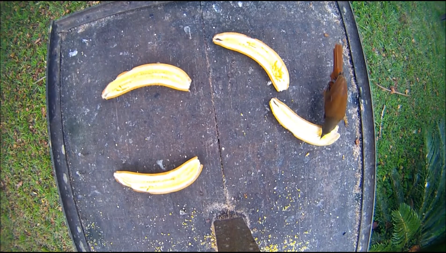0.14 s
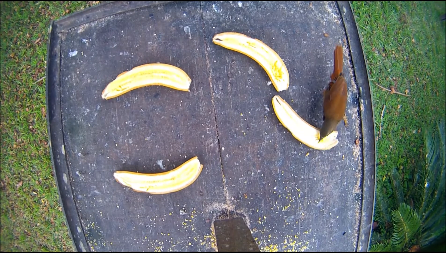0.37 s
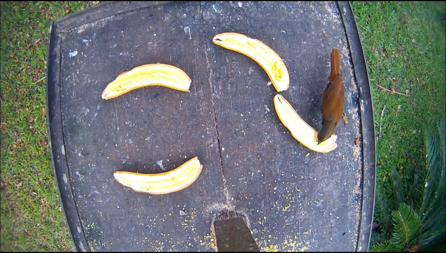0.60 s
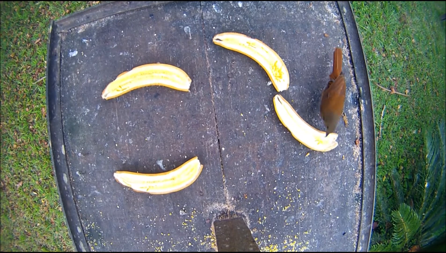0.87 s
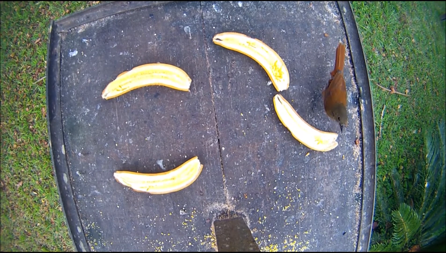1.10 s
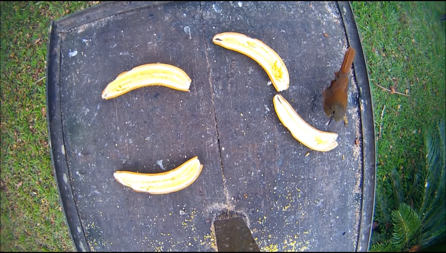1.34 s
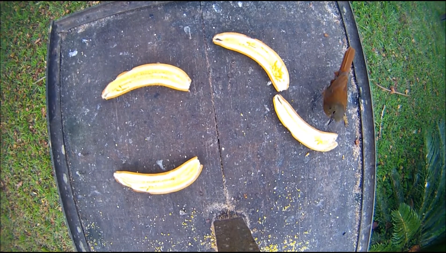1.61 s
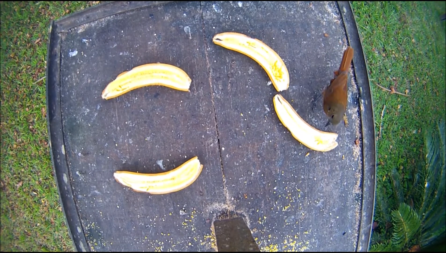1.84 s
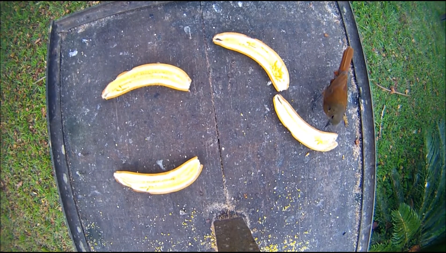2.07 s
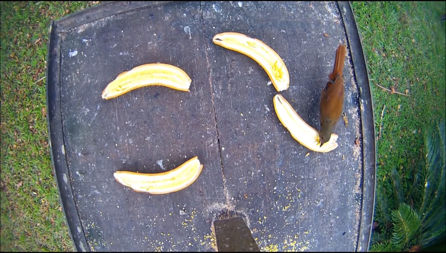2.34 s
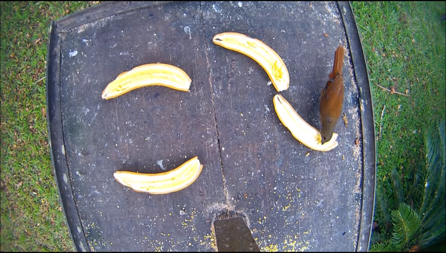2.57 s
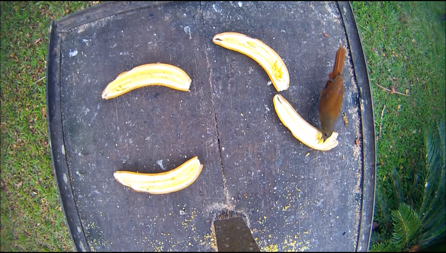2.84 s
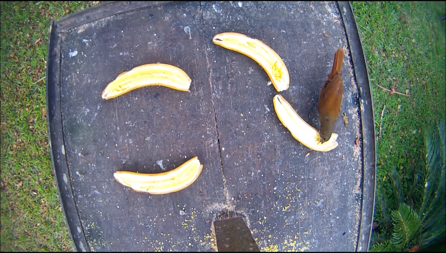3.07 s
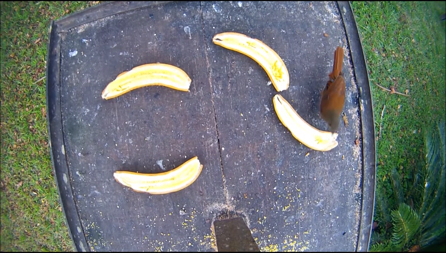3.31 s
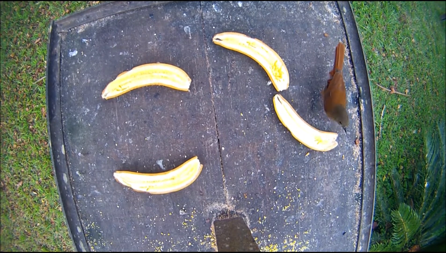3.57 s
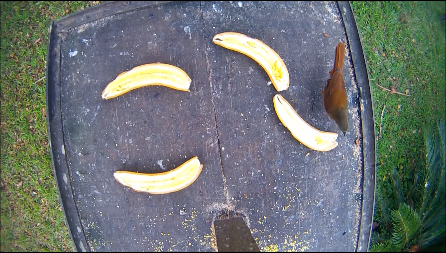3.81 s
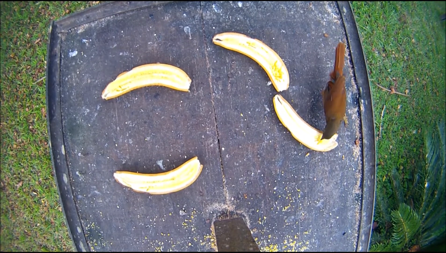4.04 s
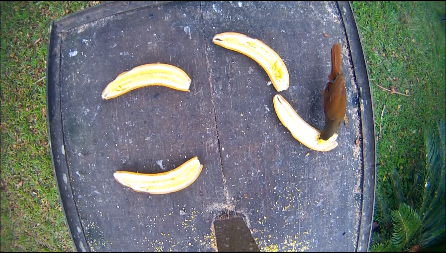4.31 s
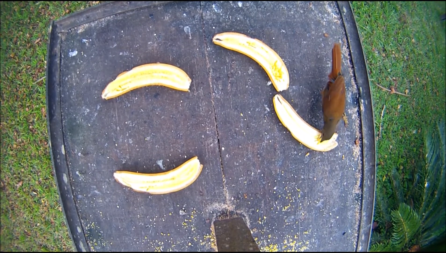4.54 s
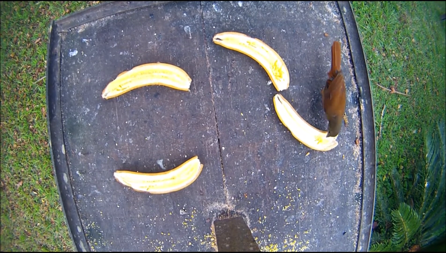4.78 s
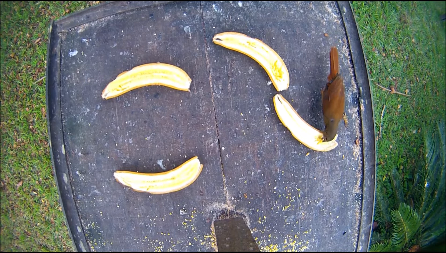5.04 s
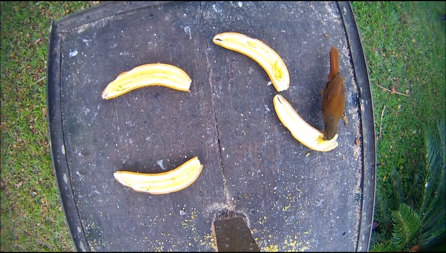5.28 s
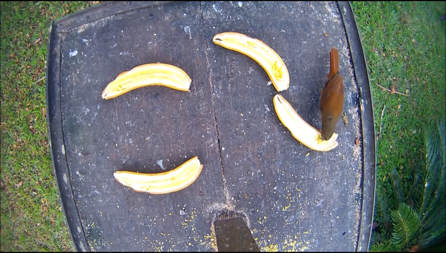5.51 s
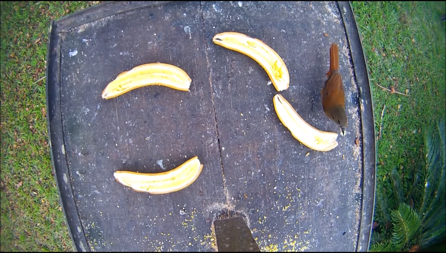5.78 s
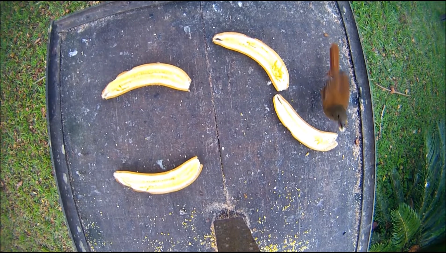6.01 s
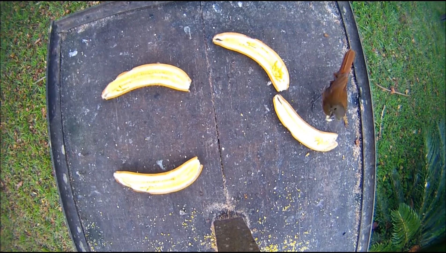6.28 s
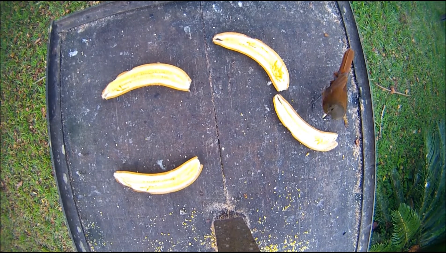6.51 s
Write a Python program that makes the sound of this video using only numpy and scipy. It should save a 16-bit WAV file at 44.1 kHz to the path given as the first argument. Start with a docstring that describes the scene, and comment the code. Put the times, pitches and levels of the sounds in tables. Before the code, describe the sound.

Outdoor feeder, heard from close by in stereo: crickets shimmer continuously, near and far, over a faint hush and low distant drone. A bright chirp slides down near the start, then sparse bird notes come from several distances, more lively in the second half. Irregular quiet thumps of a beak on wood, brushing feet and gentle wind rumble sit underneath, with light leafy echoes.

```python
"""Crickets trill in a garden, a few near and many far: falling tone bursts, repeated.
Birds call at several distances in gliding near-sine tones, and a bush cricket buzzes high above; leaves echo.
A small bird pecks fruit on a wooden feeder board: decaying low modes, with band noise for its feet.
A light breeze rumbles in the two microphones over a low drone and a faint hush, all shaped noise."""
import sys
import numpy as np
from scipy import signal
from scipy.fft import rfft, irfft, next_fast_len
from scipy.io import wavfile
from scipy.ndimage import uniform_filter1d

SR = 44100
rng = np.random.default_rng(int(sys.argv[2]) if len(sys.argv) > 2 else 0)


def gain_from_decibels(decibels):
    """Convert decibel values to linear amplitude factors."""
    exponent = np.asarray(decibels, float) / 20
    return 10 ** exponent


def store_wav(level_fs):
    """Save 16-bit WAV to argv[1]."""
    pcm = np.round(np.clip(np.atleast_2d(level_fs), -1, 1) * 32767)
    wavfile.write(sys.argv[1], SR, pcm.T.astype(np.int16))


N = 292383


def evened(x):
    """Scales to rms 1."""
    return x / np.sqrt(np.mean(x ** 2) + 1e-20)


def read(points, hz):
    """Interpolates a spectrum table on a log-frequency axis."""
    f, value = np.transpose(points)
    return np.interp(np.log(hz + 1), np.log(f + 1), value)


def curve(rows, column=1):
    """One column of a level table as a gain for every sample."""
    table = np.transpose(rows)
    return gain_from_decibels(np.interp(np.arange(N) / SR, table[0], table[column]))


def add(mix, start_s, sound, pan_db):
    """Places a sound, left louder than right by pan_db."""
    part = mix[:, max(round(start_s * SR), 0):][:, :len(sound)]
    gains = gain_from_decibels(np.array([[pan_db / 2], [-pan_db / 2]]))
    part += gains * sound[:part.shape[1]]


def garden(x, t60_s, same):
    """Echoes from leaves, walls and ground: sparse taps of random sign that die away."""
    slots = np.arange(120, SR // 2, 20)[:, None]
    at = slots + rng.integers(0, 20, (len(slots), 2))
    taps = np.zeros((SR // 2 + 20, 2))
    tap_gain = rng.choice([-1., 1.], at.shape) * gain_from_decibels(-60 * at / SR / t60_s)
    np.put_along_axis(taps, at, tap_gain, 0)
    shared, own = (taps / np.linalg.norm(taps[:, 0])).T
    tails = np.array([shared, same * shared + np.sqrt(1 - same ** 2) * own])
    return signal.fftconvolve(x, tails, axes=1)[:, :N]


def stroke(hz):
    """One scrape of a cricket's wing: a short tone burst that falls in pitch."""
    length_s, fall_share = .0055, .1
    u = np.arange(0, 1, 1 / (length_s * SR))
    turns = np.cumsum(hz * (1 + fall_share * (.5 - u))) / SR
    return np.sin(np.pi * u) ** 2 * np.sin(2 * np.pi * turns)


# trills of the nearer crickets: (first stroke [s], length [s], level [dB], wing pitch [Hz])
NEAR_TRILLS = [(.017, .11, -57, 6400), (.0835, .245, -56, 6400), (.16, .09, -52, 6110),
               (.437, .155, -55, 6250), (.6465, .205, -55, 6190), (.714, .09, -56, 6400),
               (.983, .11, -54, 6390), (1.08, .16, -57, 6200), (1.187, .2, -54, 6440),
               (1.402, .14, -55, 6160), (1.542, .25, -54, 6270), (1.652, .065, -54, 6420),
               (1.6955, .135, -57, 6400), (1.859, .09, -55, 6440), (1.957, .155, -53, 6340),
               (2.151, .225, -55, 6340), (2.37, .045, -57, 6200), (2.4435, .275, -54, 6330),
               (2.612, .09, -55, 6330), (2.7355, .11, -55, 6430), (2.796, .11, -56, 6410),
               (2.9215, .23, -54, 6140), (3.006, .135, -55, 6430), (3.245, .09, -53, 6030),
               (3.246, .2, -58, 6350), (3.345, .11, -55, 6380), (3.5455, .18, -56, 6400),
               (3.7585, .11, -59, 5700), (3.839, .18, -53, 6400), (4.1015, .155, -53, 6320),
               (4.198, .135, -54, 6340), (4.3665, .09, -57, 6460), (4.4465, .2, -55, 6470),
               (4.631, .09, -55, 6410), (4.7885, .205, -57, 6190), (4.8285, .155, -56, 6450),
               (5.067, .23, -57, 6210), (5.098, .155, -55, 6400), (5.391, .11, -54, 6400),
               (5.428, .135, -56, 6390), (5.458, .09, -55, 6400), (5.6815, .11, -54, 6460),
               (5.7165, .245, -59, 6320), (5.994, .205, -57, 6220), (6.1145, .18, -57, 6360),
               (6.265, .11, -54, 6460), (6.358, .245, -56, 6340)]


def near_crickets():
    """Even wing strokes, faster at higher pitch; strength and pitch vary a little."""
    pace_per_s, pace_at_hz, pace_per_khz = 44.9, 6400, 5
    spread_db, spread_pitch_share = 1.6, .015
    out = np.zeros((2, N))
    for s, length, db, hz in NEAR_TRILLS:
        rate = pace_per_s + pace_per_khz * (hz - pace_at_hz) / 1000
        chance = rng.standard_normal((16, 2)) * [spread_db, spread_pitch_share]
        times = np.arange(0, length - .5 / rate, 1 / rate)
        for at, (size_db, tune) in zip(times, chance):
            sound = gain_from_decibels(db + size_db) * stroke(hz * (1 + tune))
            add(out, s + at - .0055 / 2, sound, 5.5)  # centred on its time
    return gain_from_decibels(.8) * (out + gain_from_decibels(-6) * garden(out, .12, .92))


# chorus swelling and sinking: (time [s], low kinds level [dB], high kind level [dB])
CHORUS_LEVEL = [(0, -65.5, -73), (.3, -66.5, -78), (.74, -66.5, -67.5), (1.03, -66, -74.5),
                (1.75, -64, -69.5), (2.0, -66, -72.5), (2.3, -67, -70.5), (3.1, -66.5, -73.5),
                (3.32, -62.5, -76), (3.47, -70, -76), (3.6, -62, -72), (3.86, -73.5, -80), (4.1, -64, -69),
                (4.74, -65.5, -76), (5.24, -65, -71), (5.98, -63.5, -73), (6.63, -65.5, -67.5)]
# kinds of far cricket: (pitch [Hz], spread [Hz], relative level [dB], CHORUS_LEVEL column)
CHORUS_KINDS = [(5740, 300, -.5, 1), (6450, 280, -1.5, 1), (7300, 550, 0, 2)]


def far_crickets():
    """Many unsynchronised trills, each at its own pitch and pace, blur into a throbbing band."""
    trills_per_kind = 500
    bands = np.zeros((3, N + SR))  # row = level column; row 0 unused
    for hz, spread_hz, db, column in CHORUS_KINDS:
        places = rng.random((trills_per_kind, 2))
        traits = rng.standard_normal((trills_per_kind, 10))
        for k, ((start, pace), (tune, size, *jitter)) in enumerate(zip(places, traits)):
            s = (k + start) / trills_per_kind * (N / SR + .2)
            at = s + np.arange(8) / (43 + 3.5 * pace) + .0005 * np.array(jitter)
            voice = gain_from_decibels(db + 2 * size) * stroke(hz + spread_hz * tune)
            where = (abs(at) * SR).astype(int)[:, None] + np.arange(len(voice))
            bands[round(column)][where] += voice
    bands = bands[:, SR // 5:][:, :N]  # already under way at the start
    chorus = sum(curve(CHORUS_LEVEL, column=k) * evened(bands[k]) for k in (1, 2))
    direct = chorus * gain_from_decibels(np.array([[-2.], [-7.]]))
    return direct + gain_from_decibels(1) * garden(direct, .28, .93)


def whistle(hz, rough):
    """A near-sine syrinx tone; roughness shakes its strength and phase."""
    chance = rng.standard_normal((len(hz) + 99, 2))
    shake = uniform_filter1d(chance, size=70, axis=0)[50:len(hz) + 50]
    wobble = (1 - rough) + rough * evened(shake) @ [1, 1j]
    return evened((wobble * np.exp(2j * np.pi * np.cumsum(hz) / SR)).real)


# the two voices of the close call: (time [s], pitch [Hz], level [dB])
LOWER_VOICE = [(0.35, 8240, -57), (0.38, 7580, -38), (0.394, 7370, -40), (0.456, 6865, -38.5),
               (0.465, 6780, -46)]
UPPER_VOICE = [(0.359, 9400, -57.5), (0.394, 8750, -48.5), (0.424, 8400, -50.5), (0.46, 8050, -50.5)]


def close_call():
    """Both halves of the syrinx slide down together, fluttering."""
    flutter_hz, flutter_depth = 130, .4
    out = np.zeros((2, N))
    for rows in (LOWER_VOICE, UPPER_VOICE):
        s, hz, db = np.transpose(rows)
        t = np.arange(s[0], s[-1], 1 / SR)
        flutter = 1 + flutter_depth * np.cos(2 * np.pi * flutter_hz * (t - .421))
        tone = whistle(np.interp(t, s, hz), .1) * flutter * signal.windows.tukey(len(t), .1)
        add(out, s[0], gain_from_decibels(np.interp(t, s, db)) * tone, 5.)
    return out + gain_from_decibels(-5.5) * garden(out, .32, .87)


def level_notes(rows):
    """Notes of one pitch, as glides that end where they start."""
    return [(s, length, hz, hz, db) for s, length, hz, db in rows]


def repeated(starts, notes):
    """A group of notes repeated at each (start, level)."""
    return [(s + at, length, start_hz, end_hz, level + db)
            for s, level in starts for at, length, start_hz, end_hz, db in notes]


# thin held notes of far birds: (start [s], length [s], pitch [Hz], level [dB])
HELD_NOTES = [(.018, 0.115, 1985, -74.5), (.3, 0.097, 2234, -77), (.717, 0.13, 2120, -84),
              (1.07, .09, 3250, -78), (1.2, 0.15, 3160, -79), (.015, 0.059, 4320, -78),
              (.03, 0.09, 9230, -72), (1.3, .3, 4280, -79), (1.44, 0.068, 7780, -74),
              (2.245, 0.2, 5730, -64.5), (2.456, 0.076, 8150, -75), (4.5, 0.025, 8570, -68.5),
              (4.555, 0.065, 7720, -68), (4.63, 0.056, 9230, -72), (6.378, 0.11, 7180, -70)]


def held_notes():
    """Steady tones: the first three pure whistles, the others breathy."""
    notes = level_notes(HELD_NOTES)
    return [(notes[:3], 0, .15, 7.), (notes[3:], 0, .6, 6.)]


# bush cricket high above the chorus: (start [s], length [s], pitch [Hz], level [dB])
BUSH_BUZZES = [(.035, .05, 11600, -75), (.217, .07, 11700, -74), (2.65, 0.094, 11200, -74.5),
               (2.92, 0.037, 11370, -73), (3.13, .05, 11430, -76.5), (3.767, 0.031, 11850, -78),
               (4.43, .05, 11750, -75.5), (6.23, 0.056, 11610, -74)]


def bush_cricket():
    """Short buzzes: high tones with strong roughness."""
    return [(level_notes(BUSH_BUZZES), 0, .5, 4.)]


# (start [s], length [s], start pitch [Hz], end pitch [Hz], level [dB])
FALLING_CHIPS = [(1.065, .04, 4500, 3530, -70.5), (1.483, .022, 2650, 1800, -68.5),
                 (1.66, .036, 4500, 3910, -73), (1.797, 0.023, 4520, 3960, -69),
                 (3.351, .017, 4650, 3250, -73.5), (3.556, 0.044, 7700, 3950, -61),
                 (3.565, 0.043, 4500, 3000, -75), (3.838, 0.026, 8000, 6470, -59.5),
                 (3.873, 0.02, 6950, 6200, -55), (3.86, 0.042, 8300, 7240, -66),
                 (3.893, 0.029, 6450, 5680, -55.5), (4.22, 0.058, 7800, 6560, -63.5),
                 (4.265, 0.056, 7800, 6450, -67), (4.86, .025, 4000, 2900, -71),
                 (5.066, .027, 5060, 3650, -65), (5.435, 0.023, 3780, 2660, -65),
                 (5.58, 0.038, 8000, 6770, -65), (6.094, 0.028, 4980, 3750, -67.5),
                 (6.39, .03, 3880, 2840, -73), (6.612, 0.021, 10150, 9380, -66)]


def chips():
    """Quick chips: straight falls in pitch."""
    return [(FALLING_CHIPS, 0, .32, 5.5)]


# (start [s], length [s], start pitch [Hz], end pitch [Hz], level [dB])
RISING_WHISTLES = [(1.9, .12, 7030, 7370, -69.5), (1.93, .08, 6800, 7050, -72),
                   (2.005, 0.14, 7450, 7750, -69), (2.15, 0.095, 4950, 5370, -68.5),
                   (2.165, 0.12, 5300, 5650, -70), (3.515, 0.038, 6600, 8060, -60.5),
                   (3.853, 0.028, 6450, 6940, -50.5), (4.1, 0.04, 6500, 7830, -69.5),
                   (4.565, 0.077, 6350, 7860, -61.5), (5.045, 0.0346, 1923, 2310, -65),
                   (5.108, 0.0212, 3105, 3980, -67.5), (5.3, 0.128, 3680, 3860, -80),
                   (5.42, 0.13, 3850, 4430, -72.5), (6.465, 0.019, 7900, 8130, -64),
                   (6.583, 0.049, 6940, 8460, -53), (6.588, .023, 8340, 9400, -77),
                   (6.605, 0.025, 9400, 11100, -63)]


def rises():
    """Rising whistles that level off: mid-note runs ahead by a quarter of the climb."""
    return [(RISING_WHISTLES, .25, .28, 6.)]


# turns of the syllable: (time [s], level [dB])
CHATTER_TURNS = [(1.937, -67), (2.049, -68), (2.162, -66.5), (2.275, -69), (2.388, -72)]
# its notes: (time from turn [s], length [s], start pitch [Hz], end pitch [Hz], relative level [dB])
CHATTER_SYLLABLE = [(-.02, 0.0188, 2650, 3300, -5), (0, 0.0247, 3450, 2620, 0),
                    (-.045, 0.111, 3660, 3540, -12.5)]


def chatter():
    """An up-down syllable with a thin upper voice, repeated."""
    return [(repeated(CHATTER_TURNS, CHATTER_SYLLABLE), 0, .35, 6.5)]


# low phrase, sung twice: (start [s], level [dB])
WARBLE_STARTS = [(4.742, -68), (5.14, -64)]
# its notes: (time from start [s], length [s], start pitch [Hz], end pitch [Hz], relative level [dB])
WARBLE_PHRASE = [(-.064, 0.031, 2360, 2280, 1.5), (0, .032, 1930, 2575, -4), (.03, .042, 2516, 1870, -1),
                 (.048, 0.018, 2450, 2410, -1), (.08, 0.062, 2480, 2360, -9), (.144, .025, 1880, 2080, -3),
                 (.167, 0.022, 2116, 2000, 2.5), (.223, 0.017, 2020, 2005, 1)]


def warbles():
    """A low warbled phrase of short, nearly pure glides."""
    return [(repeated(WARBLE_STARTS, WARBLE_PHRASE), 0, .12, 5.)]


# one piped note: (length [s], start pitch [Hz], end pitch [Hz], level [dB])
PIPED_NOTE = (0.04, 2418, 2621, -77.5)


def pipes():
    """A far bird pipes the same rising note seven times, evenly spaced."""
    first_s, gap_s = 5.54, .0955
    return [([(first_s + k * gap_s, *PIPED_NOTE) for k in range(7)], 0, .3, 7.5)]


def scattered_notes():
    """Each note glides from first pitch to last; leaves scatter the high notes most."""
    direct, scattered = np.zeros((2, 2, N))
    groups = (held_notes() + bush_cricket() + chips() + rises()
              + chatter() + warbles() + pipes())
    for notes, bend, rough, pan_db in groups:
        for s, length, start_hz, end_hz, db in notes:
            u = np.arange(0, 1, 1 / (length * SR))
            hz = start_hz + (end_hz - start_hz) * (u + bend * 4 * u * (1 - u))
            note = gain_from_decibels(db) * whistle(hz, rough) * signal.windows.tukey(len(u), .45)
            echo_db = min(-9 + 9 * np.log2(hz.mean() / 2000), -1)
            add(direct, s, note, pan_db)
            add(scattered, s, gain_from_decibels(echo_db) * note, pan_db)
    return direct + garden(scattered, .33, .85)


# pecks and steps: (time [s], peak [dB], left over right [dB], sharpness: tilt of upper modes [dB/octave])
BOARD_HITS = [(0.234, -50, 7, -4.5), (0.357, -65, 7, -11), (0.613, -62, -3, -14), (0.806, -61.5, 9, 2),
              (2.779, -58, 9.5, 0), (3.499, -71, 7, -1), (3.923, -62, 6, 1), (4.641, -55, 7, -3),
              (5.099, -66, 3, -8), (5.687, -67.5, 9, 1), (6.043, -75, 13, -3)]
# modes of the board: (frequency [Hz], relative level [dB], t60 [s])
BOARD_MODES = [(222, 5.5, 0.13), (352, 0, 0.11), (458, 15.5, 0.034), (739, 4.5, 0.051)]


def board():
    """Each peck rings the low modes of the board, with a soft start."""
    onset_s = .0041
    out, t = np.zeros((2, N)), np.arange(round(.25 * SR)) / SR
    for s, db, pan_db, sharp_db in BOARD_HITS:
        ring = 0
        for hz, level_db, t60_s in BOARD_MODES:
            tilt_db = sharp_db * np.log2(hz / BOARD_MODES[0][0])
            ring = ring + gain_from_decibels(level_db + tilt_db - 60 * t / t60_s) * np.sin(2 * np.pi * hz * t)
        ring *= 1 - np.exp(-t / onset_s)
        add(out, s, gain_from_decibels(db) * ring / abs(ring).max(), pan_db)
    return out


def lows(spectrum, same, lean_db):
    """Steady two-channel noise of rms 1 for the bass layers."""
    size = next_fast_len(N)
    left, own = rfft(rng.standard_normal((size, 2)), axis=0).T
    right = same * left + np.sqrt(1 - same ** 2) * own
    z = np.array([left * gain_from_decibels(lean_db / 2), right * gain_from_decibels(-lean_db / 2)])
    shape = gain_from_decibels(read(spectrum, np.fft.rfftfreq(size, 1 / SR)))
    return evened(irfft(z * shape, size)[:, :N])


def swells(rows, floor_db):
    """Gain in time: peaks with straight sides in dB, power-summed with a floor."""
    t = np.arange(N // 64 + 2) * 64 / SR
    power = sum(gain_from_decibels(db - fall * abs(t - s)) ** 2 for s, db, fall in rows) + gain_from_decibels(floor_db(t)) ** 2
    return np.interp(np.arange(N) / SR, t, np.sqrt(power))


# feet shifting on the board: (time [s], level [dB], fall either side [dB/s])
FOOT_SHIFTS = [(.24, -64.5, 69), (.65, -72.5, 33), (.81, -71.5, 91.5), (1.61, -84, 100), (2.36, -72, 180),
               (2.8, -78, 69), (3.14, -75.5, 55), (3.59, -67.5, 40), (3.9, -72.5, 40), (4.67, -65, 83),
               (4.89, -75, 100), (5.1, -67, 150), (5.69, -70.5, 120), (6.05, -74, 54), (6.6, -69, 153)]


def shuffle():
    """Feet on the board: low band noise in short swells."""
    still_db = -87
    spectrum = [(110, -5.5), (150, -3.5), (225, -4), (300, -9.0), (600, -30.5)]  # (Hz, relative dB)
    return swells(FOOT_SHIFTS, lambda t: still_db) * lows(spectrum, .28, -1.3)


def sway(t):
    """Slow chance of rms 1: sines of .5 to 8 Hz in random phase."""
    return evened(sum(np.sin(2 * np.pi * (f * t + rng.random())) for f in np.geomspace(.5, 8, 24)))


# gusts on the microphones: (time [s], level [dB])
GUST_PEAKS = [(.05, -54), (.3, -58), (.54, -58), (1.47, -63), (1.79, -67), (2.16, -53.5), (2.69, -55),
              (3.16, -58), (3.65, -59), (4.52, -65), (4.87, -49.5), (5.12, -61), (5.32, -60.5), (5.47, -60),
              (5.72, -54.5), (5.91, -66.5), (6.36, -61)]
# spectrum of the wind noise: (frequency [Hz], relative density [dB])
WIND_SPECTRUM = [(4, 2), (16, -10), (30, 4.5), (55, -11), (90, -18.5), (200, -82)]


def breeze():
    """Wind on the microphones: partly shared rumble, rising in gusts over a swaying calm."""
    fall_db_per_s, calm_db, calm_sway_db = 214, -72, 4
    gusts = swells([(*row, fall_db_per_s) for row in GUST_PEAKS],
                   lambda t: calm_db + calm_sway_db * sway(t))
    return gusts * lows(WIND_SPECTRUM, .42, -1.1)


# (frequency [Hz], relative density [dB])
DRONE_SPECTRUM = [(35, -51), (60, -1.5), (90, -8.5), (115, -10), (140, -46)]


def drone():
    """Distant low drone: steady bass noise."""
    rms_db = -70.5
    return gain_from_decibels(rms_db) * lows(DRONE_SPECTRUM, .29, -5.5)


# spectrum of the hush: (frequency [Hz], relative density [dB])
HUSH_SPECTRUM = [(150, -67.5), (250, -6), (370, -10), (560, -10.5), (1380, -13.5), (4700, -13.5),
                 (8300, -15), (12700, -18), (13600, -21.5), (14800, -27)]
# (frequency [Hz], left-right likeness [0..1])
HUSH_LIKENESS = [(100, 0.1), (1400, 0.2), (3000, 0.15), (14000, 0.053)]
# (frequency [Hz], left over right [dB])
HUSH_LEAN = [(60, -2.5), (240, -0.5), (930, 0), (3650, 2.5), (14300, 1.5)]


def hush():
    """Garden hush: two-channel noise with patches drifting in time and frequency."""
    rms_db, patchy_db, size = -67.5, 1.37, 1024
    frames, hz = N // (size // 4) + 5, np.fft.rfftfreq(size, 1 / SR)
    a, b, c, d, patches = rng.standard_normal((frames, len(hz), 5)).T
    patches = uniform_filter1d(patches, size=10, axis=0)  # across frequency
    patches = evened(uniform_filter1d(patches, size=12, axis=1))  # across time
    same = np.clip(read(HUSH_LIKENESS, hz), -1, 1)[:, None]
    left, own = a + 1j * b, c + 1j * d
    z = np.array([left, same * left + np.sqrt(1 - same ** 2) * own])
    lean = read(HUSH_LEAN, hz)[:, None] * np.array([.5, -.5])[:, None, None]
    z *= gain_from_decibels(read(HUSH_SPECTRUM, hz)[:, None] + patchy_db * patches + lean)
    sound = signal.istft(z, nperseg=size, noverlap=size - size // 4)[1][:, :N]
    return gain_from_decibels(rms_db) * evened(sound)


def scene():
    """All sources together."""
    insects_and_birds = near_crickets() + far_crickets() + close_call() + scattered_notes()
    feeder = board() + shuffle()
    return insects_and_birds + feeder + breeze() + drone() + hush()


def low_pass(x):
    """Removes everything above the highest recorded frequency."""
    return signal.sosfilt(signal.butter(12, 14930, fs=SR, output="sos"), x)


# steady voltage offset, one row a channel: (offset [full scale])
CHANNEL_OFFSET = [
    [.00549],
    [.02848],
]


def record(dry):
    """The recorder adds a steady offset to each channel."""
    mix = dry + CHANNEL_OFFSET
    return low_pass(mix)


dry = scene()
out = record(dry)
store_wav(out)
```